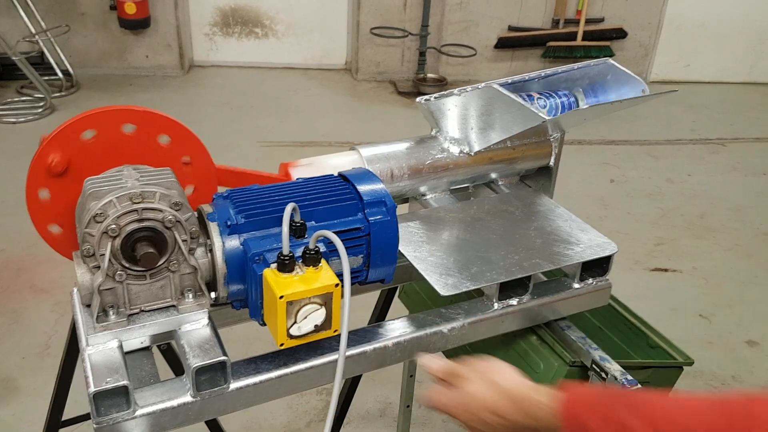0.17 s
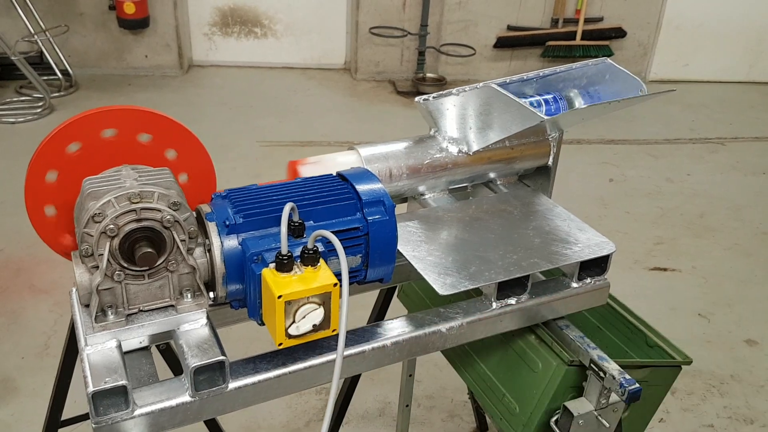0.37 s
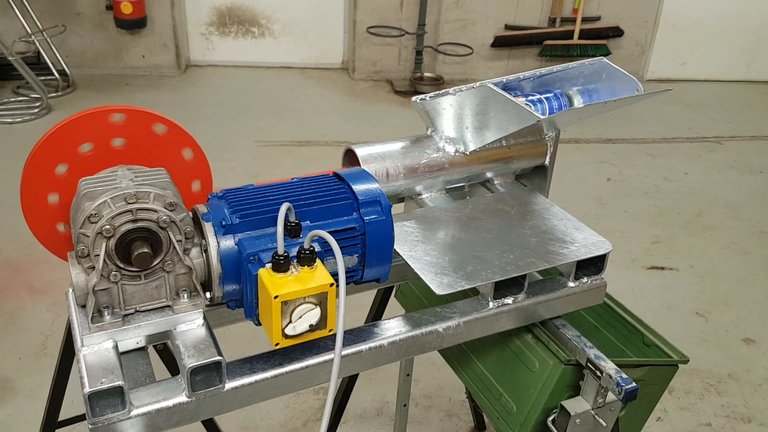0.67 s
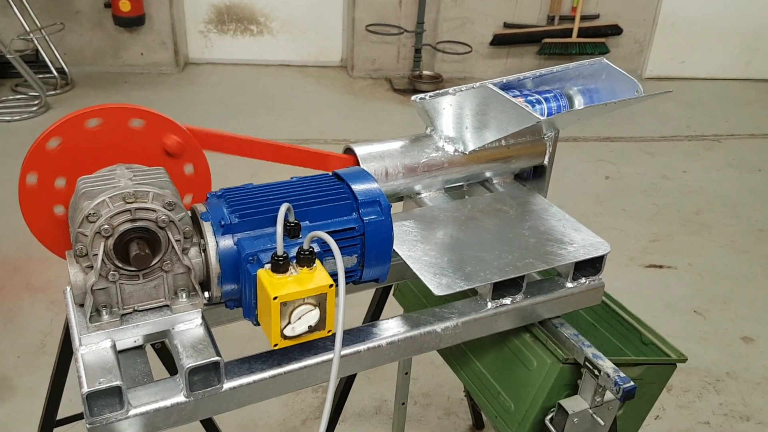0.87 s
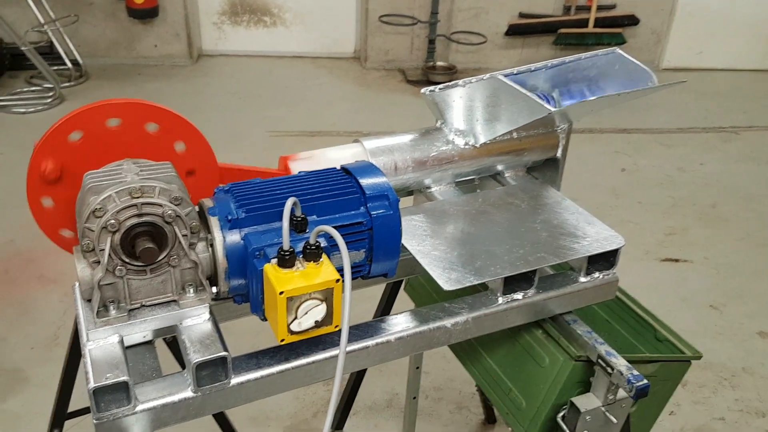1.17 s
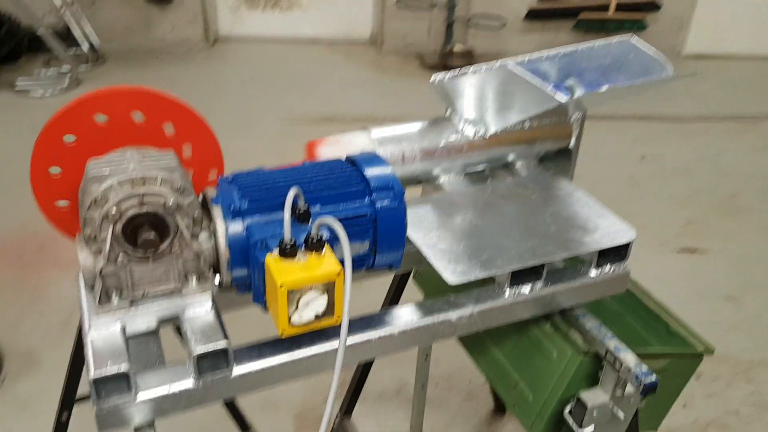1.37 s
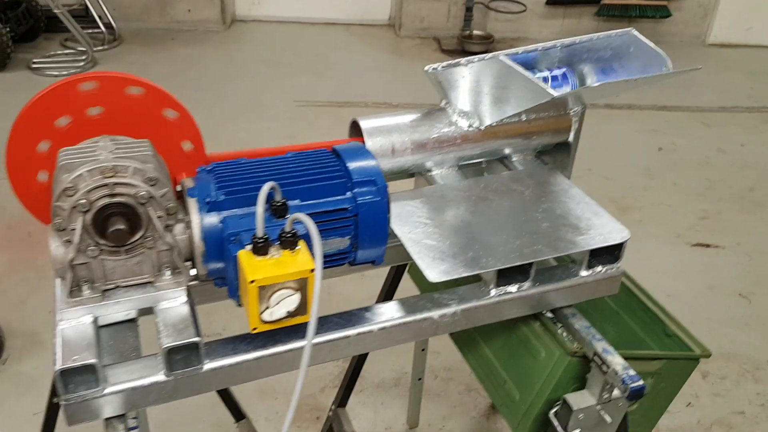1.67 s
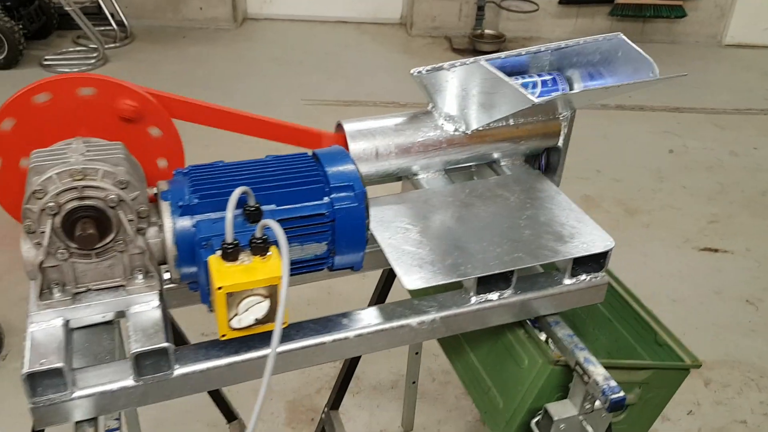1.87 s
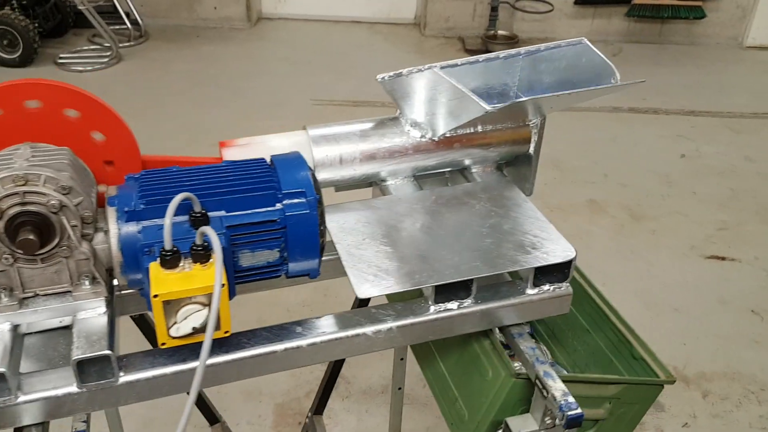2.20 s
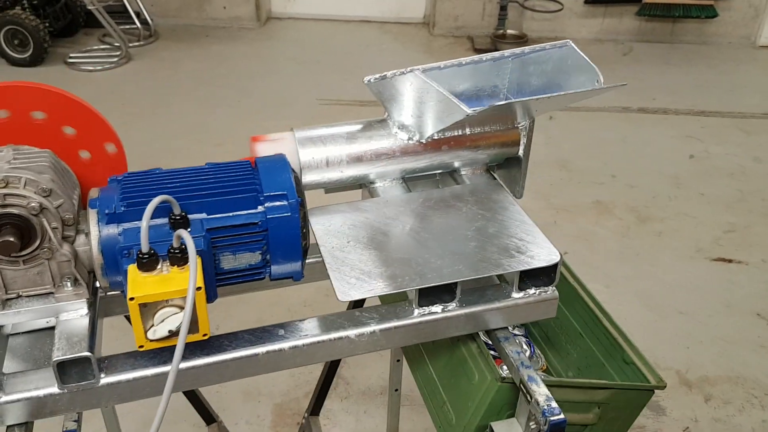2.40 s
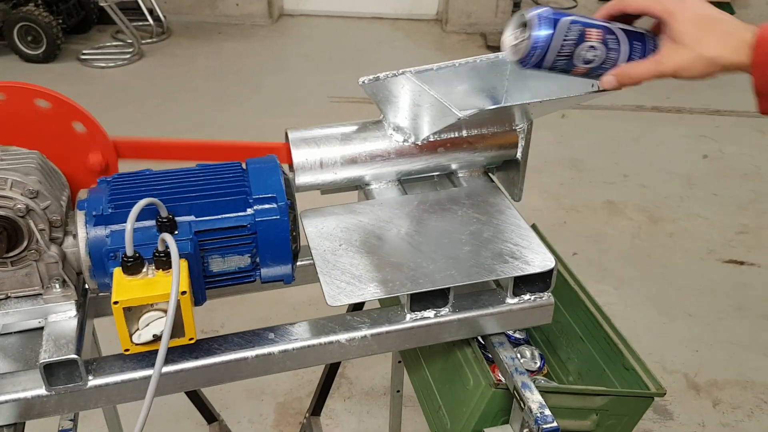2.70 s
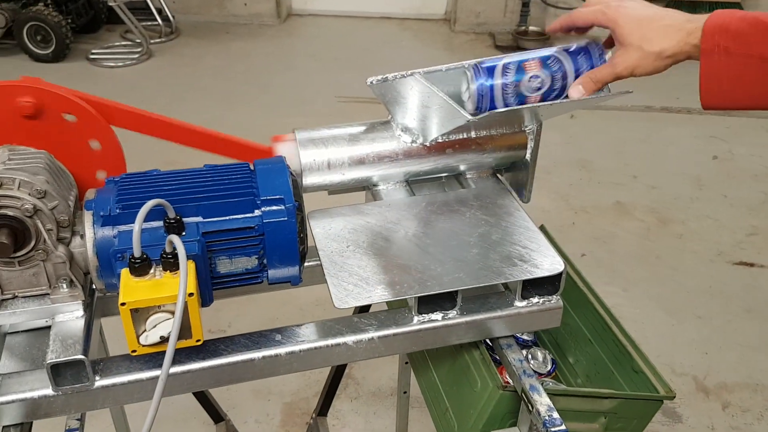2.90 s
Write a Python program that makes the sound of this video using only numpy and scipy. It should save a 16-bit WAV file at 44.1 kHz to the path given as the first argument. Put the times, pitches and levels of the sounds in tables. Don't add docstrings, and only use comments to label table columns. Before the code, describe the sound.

Thin metal cans crunch and clang in a motor-driven crusher, over a steady hum, in a workshop

```python
import sys
import numpy as np
from scipy import signal
from scipy.fft import rfft, irfft, next_fast_len
from scipy.io import wavfile
from scipy.ndimage import uniform_filter1d, map_coordinates

SR = 44100
rng = np.random.default_rng(int(sys.argv[2]) if len(sys.argv) > 2 else 0)


def invert_db(x):
    u = np.asarray(x, float) / 20
    return 10 ** u


def materialize(psi):
    bounded = np.clip(np.atleast_2d(psi).T, -1, 1)
    quanta = np.round(bounded * 32767).astype(np.int16)
    wavfile.write(sys.argv[1], SR, quanta)


N = 134505

# (f/Hz, level/dB)
SNAP_COLOUR = [(880, -54), (1500, 1.5), (2490, -0.5), (2740, -3), (5440, -9), (6630, -11), (11500, -13),
               (16000, -19.5)]


def unit(x):
    return x / np.sqrt(np.mean(x ** 2) + 1e-20)


def along(points, hz):
    f, v = np.transpose(points)
    return np.interp(np.log(hz + 1), np.log(f + 1), v)


def filtered(x, response):
    m = next_fast_len(x.shape[-1] + 8192)
    return irfft(rfft(x, m) * response(np.fft.rfftfreq(m, 1 / SR)), m)[..., :x.shape[-1]]


def noise(spectrum, size=N):
    return unit(filtered(rng.standard_normal(size), lambda hz: invert_db(along(spectrum, hz))))


def wobble(rate):
    return map_coordinates(rng.standard_normal(int(N * rate / SR) + 4), [np.arange(N) * rate / SR])


def shake(depth_db, rate, size):
    onset = np.minimum(np.arange(size) / 800, 1)
    return invert_db(depth_db * np.tanh(wobble(rate)[:size]) * onset)


def ring(hz, db, t60, t, attack=0.00048):
    hz, db, t60 = (np.asarray(v)[:, None] for v in (hz, db, t60))
    tones = np.sin(2 * np.pi * (hz * t + rng.random(hz.shape) / 4))
    x = (invert_db(db - 60 * t / t60) * tones).sum(0)
    return x * (1 - np.exp(-t / attack)) / np.sqrt(np.sum(invert_db(db) ** 2))


def rattle(hz, t60, spread, cycles, count):
    d = rng.standard_normal((count, 3))
    when = rng.random((count, 1)) ** 1.8 * 0.63 * t60
    when[:count // 6] = 0
    kinds = count // 4
    panels = np.linspace(-1.6, 1.6, kinds)[:, None] + 0.12 * d[:kinds, :1]
    panels = panels[rng.permutation(count) % kinds]
    f = hz * np.exp(spread * panels)
    k = np.arange(int(2 * cycles * SR / hz))
    fade = -80 * k / len(k) * np.exp(0.51 * np.abs(d[:, 2:]))
    level = 3 * d[:, 1:2] - 4 * panels ** 2 - 60 * when / t60 + fade
    grain = invert_db(level) * np.sin(2 * np.pi * f * k / SR) * (1 - np.exp(-k * f / SR))
    return np.bincount(((when * SR).astype(int) + k).ravel(), grain.ravel()) / np.sqrt(count / 6)


def placed(times, sounds):
    out = np.zeros(N + SR)
    for s, x in zip(times, sounds):
        out[round(s * SR):][:len(x)] += x
    return out[:N]


def motor():
    # (f/Hz, level/dB)
    whirr_colour = [(25, -51), (130, 6.5), (300, -3), (900, 0), (2000, -7.5), (4500, -25), (16000, -44)]
    # (f/Hz, width/Hz, level/dB)
    casing_tones = [(129, 14, -9.5), (304, 18, -2.5), (369, 4.5, -5.5), (3220, 74, -12), (898, 43, -0.5)]

    def casing(f):
        return sum(invert_db(db) * 1j * f * np.sqrt(w) / (c * c - f * f + 1j * f * w)
                   for c, w, db in casing_tones)

    hum = unit(filtered(rng.standard_normal(N), casing))
    start = invert_db(6.5 * np.exp(-(np.arange(N) / SR / 0.42) ** 2))
    steady_hum = invert_db(-47 + 0.5 * wobble(10.07)) * hum
    whirr = invert_db(-44 + 0.67 * wobble(2.0)) * noise(whirr_colour)
    return start * (steady_hum + whirr)


def knocks(t):
    # (t/s, peak/dB)
    turns = [
        (0.8, -8),
        (1.769, -12),
        (2.728, -11.5),
    ]
    # (f/Hz, level/dB, t60/s)
    frame_tones = [(403, -12.5, 0.49), (707, -11.5, 0.48), (733, -3.5, 0.65), (1050, -1.5, 0.12),
                   (1115, -2, 0.51), (1402, 5, 0.29), (1436, -4.5, 0.44), (2178, -20, 0.34),
                   (1770, -15, 0.16), (2436, -15.5, 0.51)]
    hz, level, t60 = np.transpose(frame_tones)
    thud = invert_db(3 - 60 * t / 0.014) * np.sin(2 * np.pi * 800 * t)
    fall = invert_db(-60 * t / 0.07) + invert_db(-11)
    hits = []
    for s, db in turns:
        unsteady = shake(5.5, 77, size=len(t))
        clank = ring(hz, level + rng.normal(0, 0.95, len(hz)), t60, t)
        hits.append(invert_db(db - 2.5) * (thud + fall * unsteady * clank))
    return placed([r[0] for r in turns], hits)


def groans():
    # (start/s, length/s, peak/dB, first f/Hz, last f/Hz)
    slides = [(0.29, .17, -22, 263, 220), (2.145, 0.159, -23, 460, 402), (1.2, 0.048, -17.5, 300, 248),
              (1.313, 0.096, -19, 258, 233), (1.51, 0.186, -28, 298, 283), (2.17, 0.235, -19.5, 332, 307),
              (2.62, 0.315, -31.5, 385, 378), (0.71, 0.29, -38, 387, 378)]
    rise_s, fall_db = 0.012, 7
    notes = []
    for s, length, db, first_hz, last_hz in slides:
        u = np.arange(int(length * SR)) / SR
        hz = np.linspace(first_hz, last_hz, len(u)) * (1 + 0.03 * wobble(59.1)[:len(u)])
        edge = np.minimum(1, np.minimum(u, u[::-1]) / rise_s)
        level = invert_db(db - fall_db * u / length) * shake(5, 54.5, size=len(u)) * edge
        notes.append(level * np.sin(2 * np.pi * np.cumsum(hz) / SR))
    return placed([r[0] for r in slides], notes)


def booms(t):
    # (t/s, peak/dB, centre f/Hz, t60/s)
    drops = [(.49, -14, 190, 0.25), (1.174, -13, 266, 0.19), (1.3, -19, 245, 0.4), (2.141, -5.5, 197, 0.24),
             (2.219, -11, 195, 0.42), (2.431, -16, 197, 0.31), (.66, -25.5, 228, 0.76)]
    # (f/Hz, level/dB)
    tube_tones = [(136, -1), (168, 1), (243, 1), (273, 0.5), (330, -0.5), (380, -11), (405, -0.5)]
    hz, level = np.transpose(tube_tones)
    boom_db, rattle_db, spread = -2, 5, 0.86
    hits, shakes = [], []
    for s, db, c, t60 in drops:
        tones = level - 4 * (np.log(hz / c) / spread) ** 2 + rng.normal(0, 4.0, len(hz))
        hits.append(invert_db(db + boom_db) * ring(hz, tones, np.full(len(hz), t60), t, attack=0.00092))
        shakes.append(invert_db(db + boom_db + rattle_db) * rattle(c, t60, 0.63, 4.9, count=18))
    u = 2 * np.pi * 60 * t
    puff = invert_db(-6) * u * np.exp(1 - u)
    return placed([r[0] for r in drops] * 2, hits + shakes), placed([2.432], [puff])


def crumple():
    # (start/s, end/s, level/dB, brightness/dB)
    squeezes = [(0.225, 0.419, -22.5, -2.5), (0.485, 0.755, -27, 2), (1.109, 1.43, -24.5, -7.5),
                (1.461, 1.691, -23, -6), (2.143, 2.313, -26, -5.5), (2.413, 2.63, -28, -2.5)]
    # (f/Hz, level/dB)
    scrape_colour = [(100, -49), (200, -28), (600, -11.5), (1000, -8), (2000, -14.5), (5000, -34.5),
                     (9000, -38)]
    sag_db, release_s = -7, 0.067
    t = np.arange(N) / SR
    press = []
    for a, b, db, _ in squeezes:
        level = invert_db(db + sag_db * (t - a) / (b - a))
        press.append((t > a) * level * np.exp(-np.maximum(t - b, 0) / release_s))
    count = int(500 * N / SR)
    when, chance = rng.random((2, count, 1))
    stray = np.minimum(np.abs(rng.standard_normal((count, 1)) + 1) - 1, 2.2)
    hz = 1116 * np.exp(0.6 * stray)
    k = np.arange(640)
    level = -9.5 * np.log(chance + 0.093) - 30 * k * hz / SR / 4.7
    grain = invert_db(level) * np.sin(2 * np.pi * hz * k / SR)
    buckles = np.bincount(((when * N).astype(int) + k).ravel(), grain.ravel())[:N]
    body = unit(buckles) + 0.76 * noise(scrape_colour) * invert_db(0.31 * wobble(41.07))
    fizz = noise(SNAP_COLOUR) * invert_db(3 * wobble(60) + 3 * wobble(500))
    return invert_db(0.5) * sum(p * (body + invert_db(row[3] - 3.5) * fizz) for p, row in zip(press, squeezes))


def pings(t):
    # (t/s, peak/dB, f/Hz, t60/s)
    clear_rings = [(.138, -44, 4400, .25), (.22, -25, 3700, .1), (2.057, -26, 1760, .15),
                   (.9885, -21, 2500, .02), (1.1068, -9, 930, .05), (1.1075, -19, 525, .2),
                   (1.451, -12, 1390, .03), (2.2765, -9, 1480, .03), (2.575, -11, 945, .04)]
    sounds = []
    for s, db, hz, t60 in clear_rings:
        pair = ring(hz * np.array([1, 1.04]), [0, -4], [t60, t60], t)
        sounds.append(invert_db(db) * shake(4, 87, size=len(t)) * pair)
    return placed([r[0] for r in clear_rings], sounds)


def dents(t):
    # (t/s, peak/dB, f/Hz)
    panel_pops = [(0.23, -10.5, 2460), (0.236, -28, 1070), (0.24, -9.5, 1800), (0.25, -9, 2410),
                  (0.269, -12, 2570), (0.297, -10, 1750), (0.359, -14, 1025), (0.368, -14, 1810),
                  (0.385, -10, 1238), (0.488, -16, 2350), (0.492, -15, 1930), (0.498, -8.5, 990),
                  (0.502, -22.0, 3165), (0.505, -19, 2330), (0.517, -13, 3160), (0.518, -15, 581),
                  (0.52, -28, 1930), (0.529, -21.7, 2777), (0.547, -12, 1002), (0.559, -21.1, 1701),
                  (0.566, -15.5, 557), (0.607, -22, 2200), (0.611, -10, 1218), (0.63, -11.5, 1160),
                  (0.656, -10.5, 2375), (0.677, -12, 2030), (1.108, -20, 910), (1.183, -21.1, 1920),
                  (1.201, -12, 1915), (1.236, -15.5, 800), (1.294, -15, 790), (1.328, -13.5, 1777),
                  (1.331, -15.5, 1407), (1.35, -12.5, 750), (1.459, -28, 1350), (1.463, -28, 2160),
                  (1.464, -24.4, 3200), (1.462, -16, 1735), (1.471, -27, 884), (1.57, -9, 875),
                  (1.587, -14.2, 815), (1.591, -13, 1583), (1.604, -8.5, 739), (1.628, -10, 900),
                  (2.156, -15, 1886), (2.162, -11, 965), (2.276, -26, 1300), (2.433, -31, 1510),
                  (2.435, -10, 937), (2.438, -27, 2476), (2.47, -13.5, 847), (2.575, -13, 917)]
    rise_s = 0.003095
    sounds = []
    for s, db, hz in panel_pops:
        t60 = 0.076 * np.sqrt(1000 / hz)
        sounds.append(invert_db(db + 1) * ring([hz], [0], [t60], t[:SR // 8], attack=rise_s))
    return placed([r[0] - rise_s for r in panel_pops], sounds)


def clangs():
    # (t/s, peak/dB, centre f/Hz, t60/s, pitch spread in log units)
    blows = [(0.222, -0.5, 1665, 0.54, 0.56), (.484, 0.5, 1270, 0.18, 0.309), (.56, -9, 553, 0.13, 0.17),
             (0.605, -1.5, 1420, .3, 0.452), (1.107, -6.5, 1102, .1, 0.49), (1.179, -24, 1530, 0.24, 0.46),
             (1.331, -6, 800, 0.27, 0.4), (1.553, -0.5, 899, .45, 0.21), (2.057, -9, 1940, 0.22, 0.39),
             (2.057, -16, 625, .2, 0.23), (2.355, -16, 690, .1, 0.15), (2.42, -9, 1163, .05, 0.21),
             (2.537, -6, 717, 0.0806, 0.205), (2.155, -0.5, 1214, 0.33, 0.44),
             (2.275, -2, 1445, 0.15, 0.33), (2.391, -5.5, 1130, 0.17, 0.37),
             (2.433, -1.5, 1140, 0.16, 0.55), (3.001, -17.5, 1510, 0.25, 0.42),
             (3.045, -14.5, 1270, 0.13, 0.21)]
    sounds = [invert_db(db - 5.5) * rattle(hz, t60, spread, 34, count=48) for s, db, hz, t60, spread in blows]
    return placed([r[0] for r in blows], sounds)


def snaps(t):
    # (t/s, peak/dB, t60/s, treble tilt/dB per octave)
    folds = [(0.2197, -10, 0.018, -2.5), (0.2775, -11.5, 0.23, -0.5), (0.4848, -22, 0.11, 3),
             (0.4972, -4, 0.059, 1.3), (0.594, -9, 0.041, -1.5), (0.7408, -25, 0.041, -7),
             (0.966, -39, 0.046, 16), (0.9882, -34.5, 0.046, -0.5), (1.1077, -13.5, 0.046, -2.5),
             (1.1846, -17.5, 0.2, -6.5), (1.2776, -15.5, 0.094, -2.5), (1.452, -18, 0.027, 1),
             (1.4634, -3.5, 0.051, 1.7), (1.6039, -11, 0.035, -1.5), (1.648, -16, 0.069, 1.5),
             (1.6759, -14.5, 0.014, 2.5), (1.952, -35, 0.029, -0.5), (2.057, -21, 0.083, -4),
             (2.1411, -22, 0.54, -2), (2.2785, -15, 0.059, 2), (2.391, -16.5, 0.046, 1.5),
             (2.4335, -4.5, 0.063, 1.7), (2.5095, -16, 0.022, 6), (2.5597, -17.5, 0.033, 5),
             (2.6883, -16, 0.016, -0.5), (2.981, -35, 0.077, -1.5), (2.998, -32.5, 0.084, -4.5),
             (3.0444, -27.5, 0.055, -1)]
    impulse = np.arange(512) == 128
    sprays, clicks = [], []
    for s, db, t60, tilt in folds:
        colour = [(hz, level + tilt * np.log2(hz / 6000)) for hz, level in SNAP_COLOUR]
        tail = invert_db(-60 * t / t60) * invert_db(0.93 * wobble(380)[:len(t)])
        edge = 1.2 * invert_db(-60 * t / 0.0019)
        sprays.append(invert_db(db - 5) * noise(colour, len(t)) * (tail + edge))
        click = unit(filtered(impulse, lambda hz: invert_db(along(colour, hz))))
        clicks.append(invert_db(db + 12) * np.sqrt(t60) * click)
    times = [r[0] for r in folds]
    return placed(times, sprays), placed(times, clicks)


def room(x):
    # (f/Hz, t60/s)
    echo_t60 = [(100, 0.42), (500, 0.63), (2000, 0.67), (6000, 0.5), (14000, 0.13)]
    # (f/Hz, likeness from 0 to 1)
    likeness = [(150, 0.98), (500, 0.78), (1200, 0.054), (12000, 0.069)]
    wall_s = 0.004
    out, step = np.zeros((2, N + 2 * SR)), SR // 4

    def turn(hz):
        return np.arccos(np.clip(along(likeness, hz), -1, 1)) / 2

    for a in range(0, N, step):
        hz, t, z = signal.stft(rng.standard_normal((2, SR)), SR, nperseg=256)
        fading = z * invert_db(-60 * t / along(echo_t60, hz)[:, None])
        pair = signal.istft(fading, SR, nperseg=256)[1][:, :SR]
        mid, side = filtered(pair, lambda f: np.array([np.cos(turn(f)), np.sin(turn(f))]))
        tail = np.array([mid + side, mid - side])
        wet = signal.fftconvolve(x[None, a:a + step], tail / np.linalg.norm(tail[0]), axes=1)
        out[:, a + round(wall_s * SR):][:, :wet.shape[1]] += wet
    return out[:, :N]


def scene():
    # (f/Hz, left lead/rad)
    lead = [(800, 0), (2300, -1), (4700, -2), (8100, -14.5), (16000, -22.5)]
    # (f/Hz, left over right/dB)
    balance = [(100, -1.5), (2400, -1), (4400, -4.5), (8100, 2), (15000, 7.5)]
    t = np.arange(SR * 3 // 4) / SR
    spray, clicks = snaps(t)
    boom, puff = booms(t)
    knock = knocks(t)
    pops = pings(t) + dents(t) + groans()
    rest = clangs() + boom + crumple() + motor()
    sides = np.array([[0.5], [-0.5]])
    near = spray + knock + pops + rest
    direct = filtered(near, lambda hz: np.exp(1j * sides * along(lead, hz)))
    direct = direct + puff * np.array([[0.6], [1.1]])
    wet = room(invert_db(-6) * clicks + invert_db(-2) * knock + invert_db(-7) * pops + invert_db(-0.5) * rest)
    return filtered(direct + wet, lambda hz: invert_db(sides * along(balance, hz)))


def band_limit(x):
    return signal.sosfilt(signal.butter(12, 16440, fs=SR, output="sos"), x)


def record(dry):
    low_cut_hz, knee_db, squeeze_s = 129, -4.5, 0.0035
    top, hardness = 0.89, 14
    x = filtered(dry, lambda hz: (1j * hz / (low_cut_hz + 1j * hz)) ** 2)
    power = np.abs(uniform_filter1d((x ** 2).mean(0), 1 + int(squeeze_s * SR)))
    x = x / (1 + power / invert_db(2 * knee_db)) ** 0.076
    mix = x / (1 + np.abs(x / top) ** hardness) ** (1 / hardness)
    return band_limit(mix)


dry = scene()
out = record(dry)
materialize(out)
```